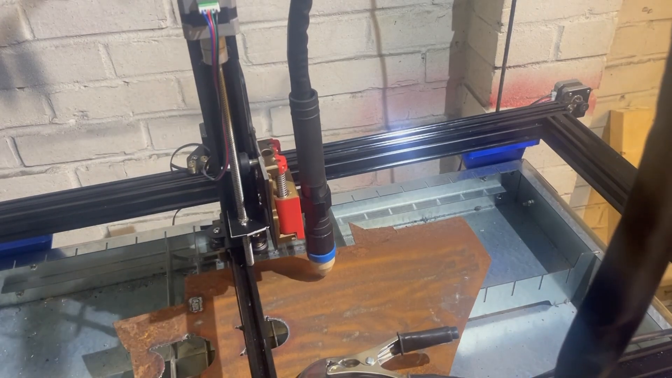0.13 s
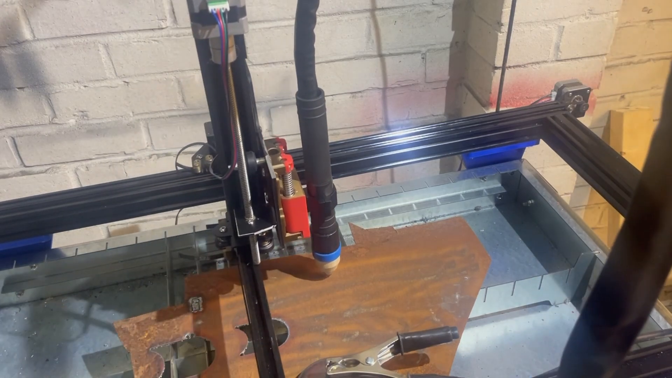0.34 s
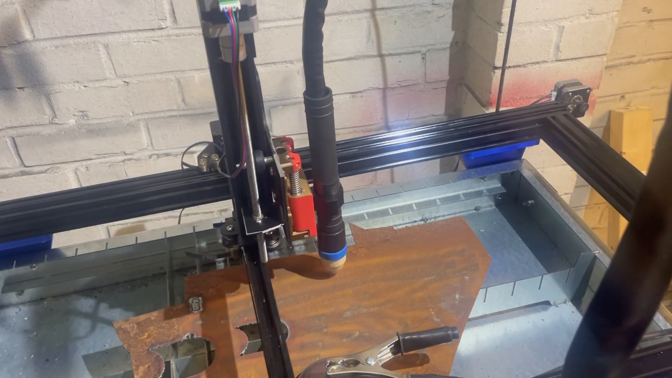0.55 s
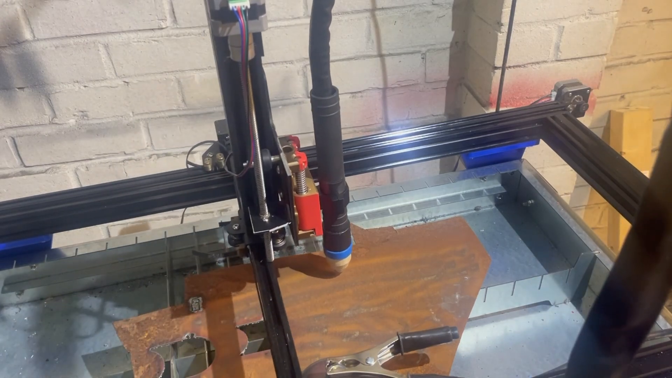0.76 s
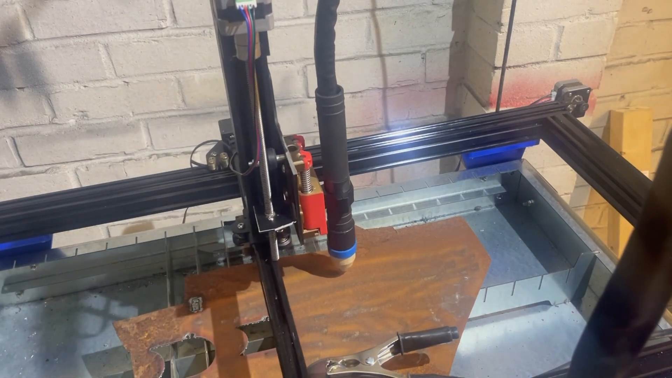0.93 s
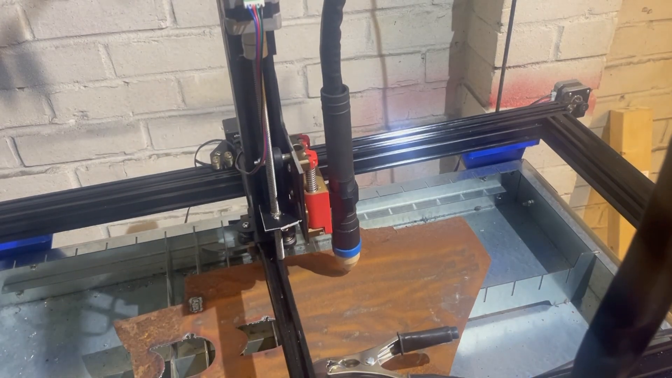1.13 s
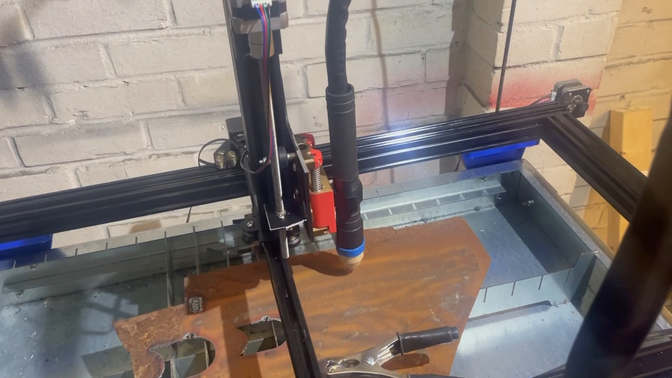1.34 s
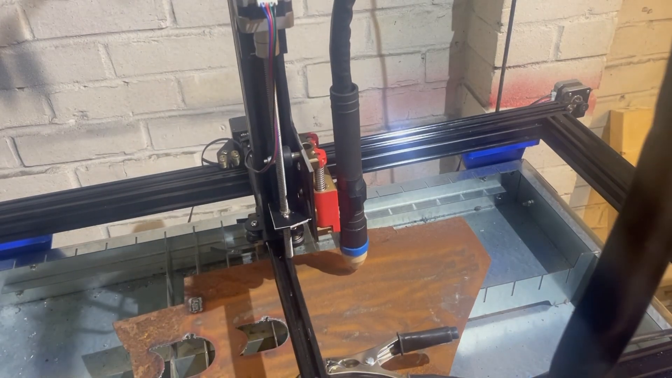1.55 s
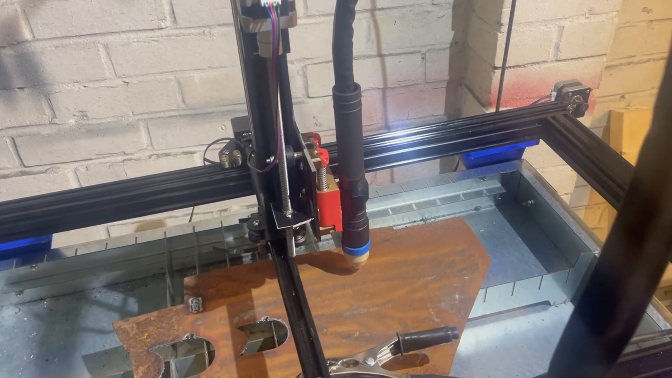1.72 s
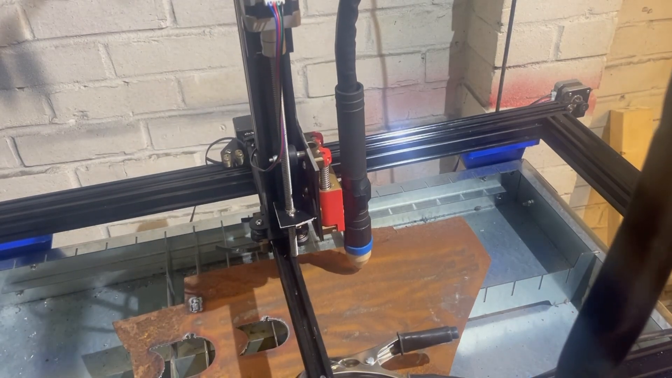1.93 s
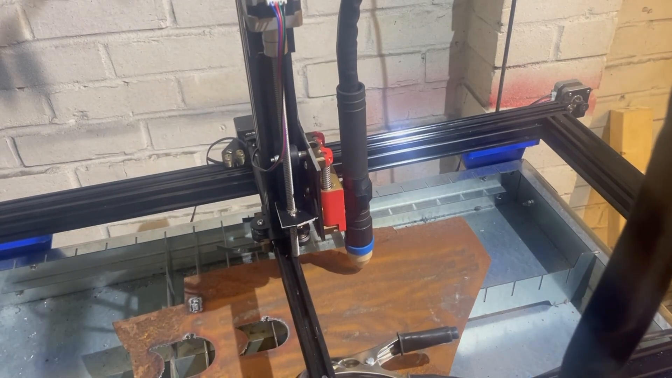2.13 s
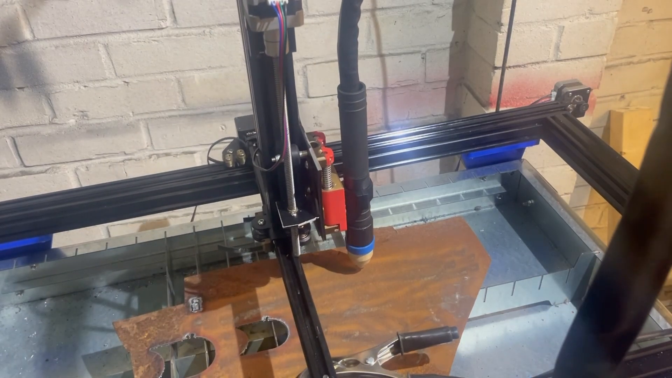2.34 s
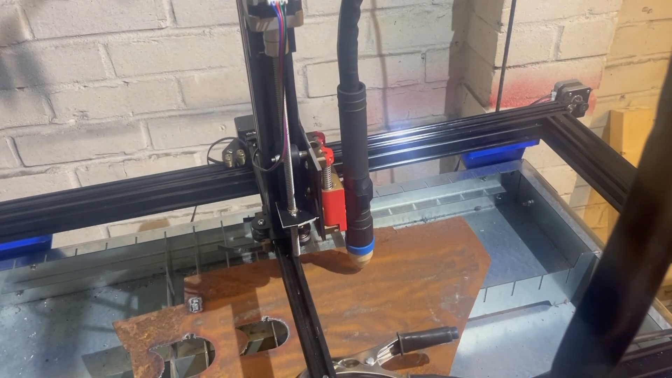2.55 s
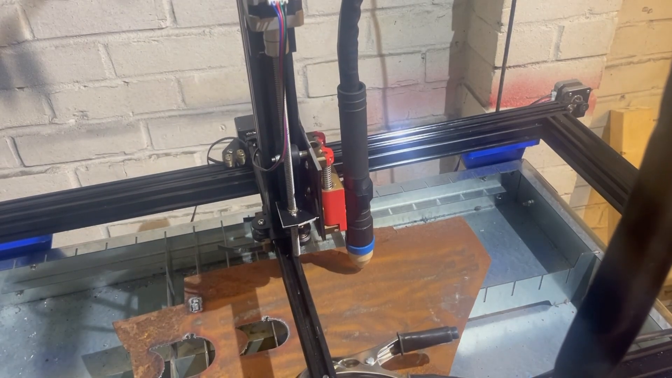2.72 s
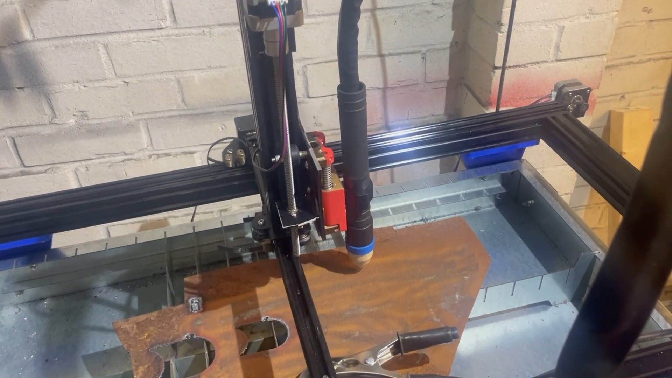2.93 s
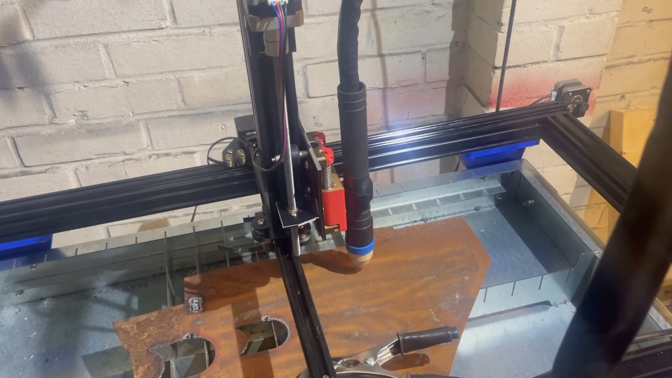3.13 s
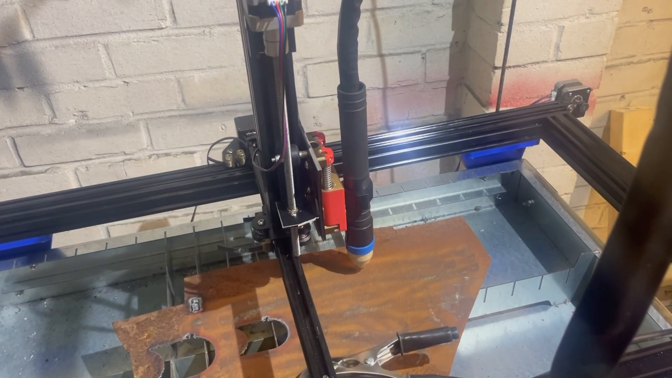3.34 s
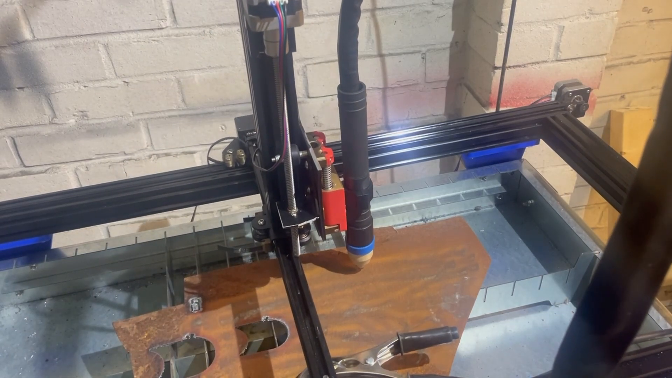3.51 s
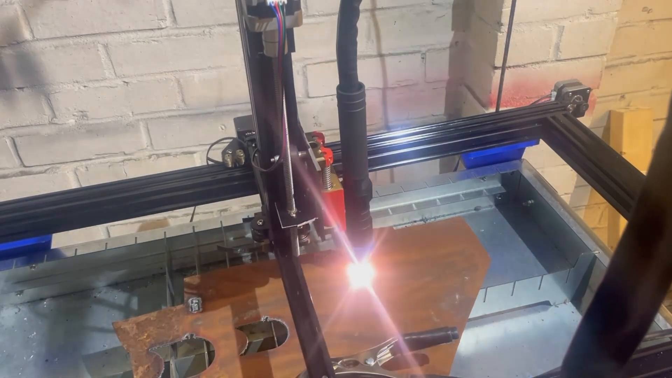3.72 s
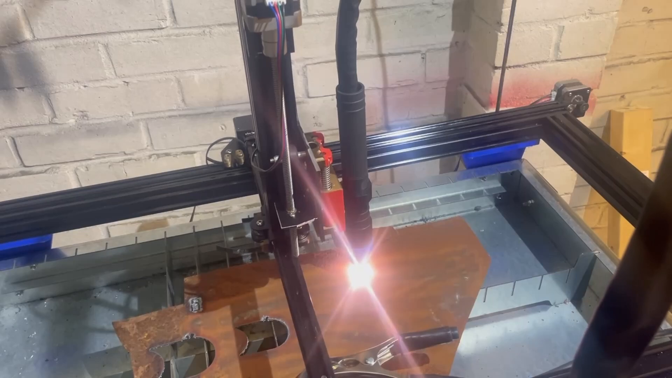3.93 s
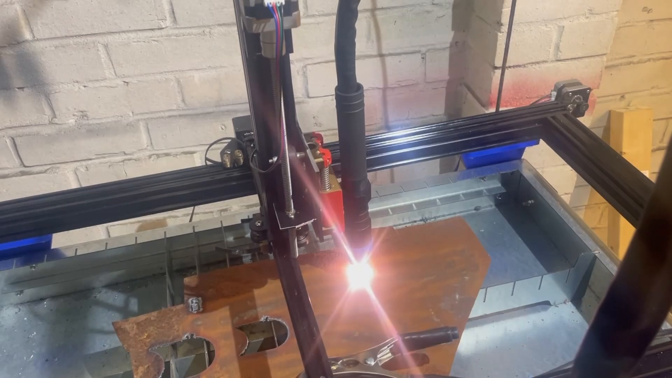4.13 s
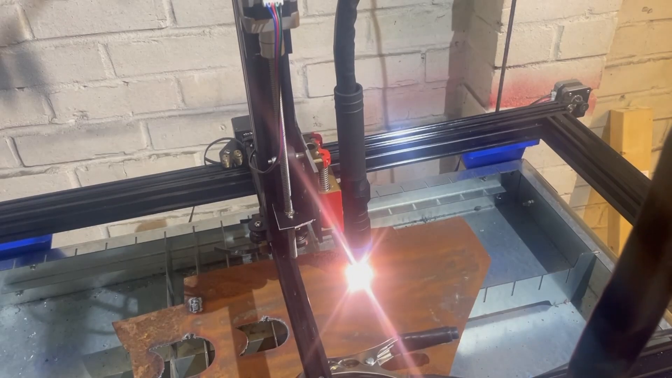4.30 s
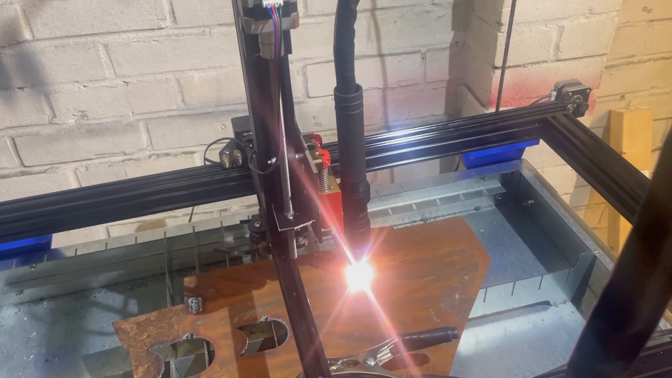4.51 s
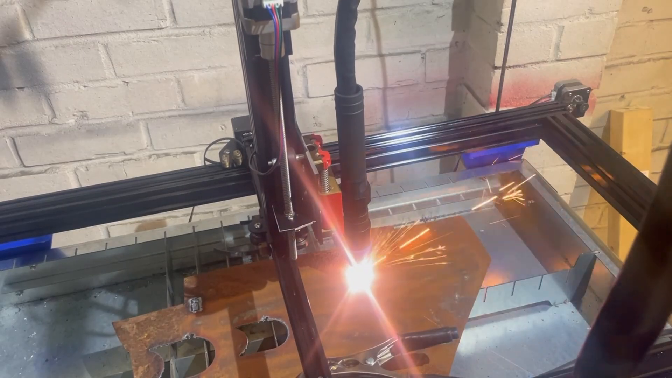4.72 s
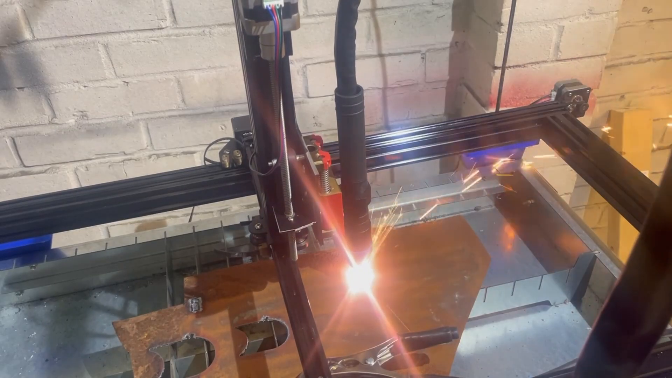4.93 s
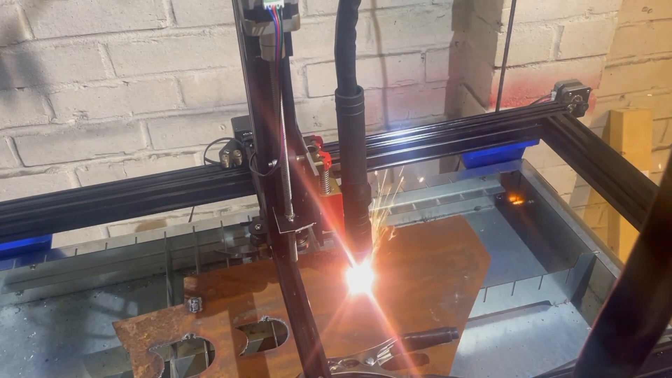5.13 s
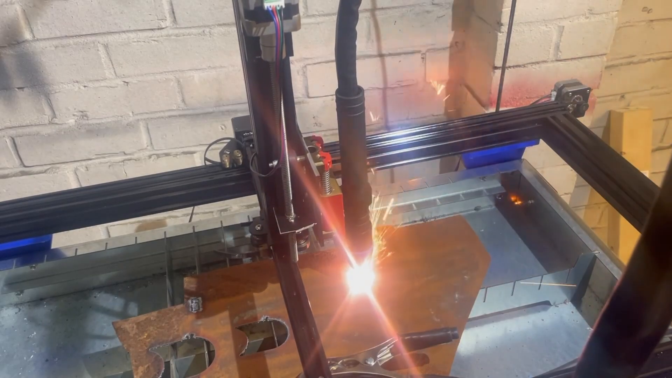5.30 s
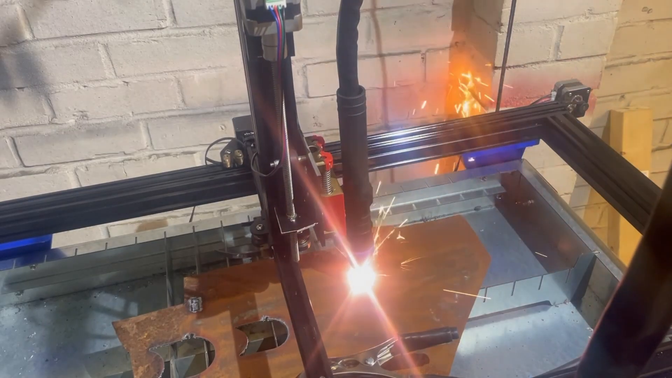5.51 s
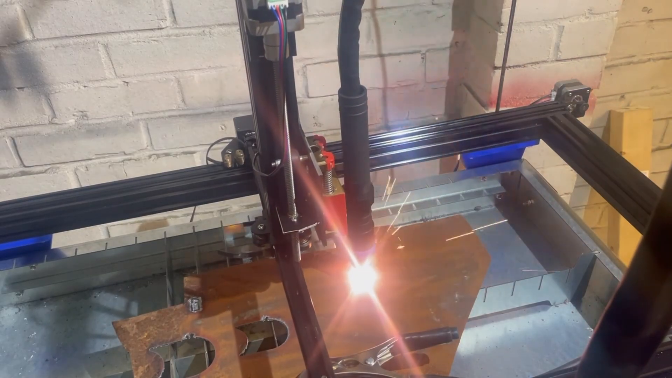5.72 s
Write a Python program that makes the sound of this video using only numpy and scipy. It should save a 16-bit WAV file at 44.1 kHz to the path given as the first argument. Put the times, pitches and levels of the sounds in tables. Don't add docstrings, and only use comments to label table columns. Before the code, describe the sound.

Close stereo pickup of a cutting machine: a crisp air hiss swells slightly and fades quickly, leaving low fan noise, thin motor whine and a soft housing rattle. After a tiny click and puff, the plasma jet bursts on abruptly, much louder, masking the background. Irregular short falling thumps hit the microphone, thick at first, then scattered, while the steady hiss continues to the end.

```python
import sys
import numpy as np
from scipy import signal
from scipy.fft import rfft, irfft, next_fast_len
from scipy.io import wavfile
from scipy.ndimage import uniform_filter1d, map_coordinates

SR = 44100
rng = np.random.default_rng(int(sys.argv[2]) if len(sys.argv) > 2 else 0)


def log_audio(samples):
    frames = np.atleast_2d(samples).T
    limited = np.clip(frames, -1, 1)
    pcm = np.round(limited * 32767).astype(np.int16)
    wavfile.write(sys.argv[1], SR, pcm)


def amplitude_ratio(level_db):
    exponent = np.asarray(level_db, float) / 20
    return 10 ** exponent


N = 258426
STRIKE_S = 3.54


# time in seconds, level in dB.
ARC_LEVEL = [
    (3.54, -33.5),
    (3.56, -37),
    (3.6, -35),
    (4.14, -34),
    (4.26, -39),
    (4.55, -39.5),
    (5.53, -38.5),
    (5.86, -38),
]
# frequency in Hz, density in dB per Hz.
ARC_HISS = [(5000, -23), (6500, -4), (8200, 0), (10500, -1), (13000, -2.5), (14200, -0.3), (15500, -12)]
ARC_BODY = [(40, -3), (200, -4), (800, -3), (1500, -1.5), (3000, 0.5), (4500, -2.5), (5600, 3.5),
            (7000, -9.5)]


def cutting_arc():
    settle_s = 0.089
    body_db = -4.5 + 4.5 * np.exp(-np.abs(seconds() - STRIKE_S) / settle_s)
    arc = jet((3.5, 9), curves(ARC_LEVEL)[0], body_db, ARC_HISS, ARC_BODY,
              hiss_db=5.5, body_db=4.5, flicker_db=0.5)
    return arc * between(3.5395, 9, 0.00089)


# start in seconds, level in dB, rise in ms, length in ms.
PUSHES = [(3.715, -23, 1.5, 41), (3.849, -27, 5.6, 35), (3.861, -20, 1.2, 40), (3.873, -22, 6.8, 12),
          (3.9228, -19.5, 2.6, 24), (3.9332, -17, 1.7, 26), (3.9696, -29, 1.9, 40), (4.014, -18, 1.2, 39),
          (4.0434, -20.5, 0.93, 15), (4.0494, -21, 0.66, 7), (4.0618, -26, 1.2, 64),
          (4.152, -27.5, 2.4, 43), (4.1653, -28, 2.5, 43), (4.18, -29.5, 2.1, 36), (4.2293, -25, 0.73, 46),
          (4.3267, -28.5, 1.5, 78), (4.3484, -24, .57, 16), (4.3902, -32, 2.6, 31),
          (4.541, -25.5, 0.81, 39), (4.6267, -26.5, 0.45, 25), (4.6443, -30.5, 2.1, 34),
          (4.815, -25.5, 1.8, 5.5), (4.8211, -26, 1.8, 29), (4.9892, -35.5, 4.4, 27),
          (5.254, -31.5, .75, 42), (5.453, -26, 6.5, 13), (5.6716, -32, 0.7, 26), (5.682, -32, 6.5, 43),
          (5.6849, -21.5, 1, 30), (5.7829, -17.5, 1.7, 31)]
# start in seconds, level in dB, rise in ms, length in ms.
PULLS = [(3.7226, -27, 0.73, 44), (3.737, -27, 4.5, 64), (3.8298, -20, 0.96, 33), (3.9094, -20.5, 0.84, 26),
         (3.9279, -22.5, 2.2, 10), (3.959, -25, 0.58, 26), (3.976, -27, 1.1, 76), (4.0374, -17, .33, 34),
         (4.0919, -22.5, 0.48, 36), (4.1606, -21.5, 1.4, 27), (4.2156, -20.5, 1.2, 13.5),
         (4.2574, -32.5, .89, 76), (4.286, -22.5, 1.7, 9.9), (4.3658, -25, 2.7, 11.3),
         (4.584, -30, 0.91, 41), (4.6223, -24.5, 2.8, 31), (4.7006, -29, 0.6, 17), (4.7676, -27, 0.87, 45),
         (4.8403, -28.5, 1.4, 23), (4.85, -27.5, 1.6, 35), (5.2238, -34.5, 2.2, 38),
         (5.357, -35.5, 3.9, 48), (5.518, -34.5, 1.7, 28), (5.6398, -34.5, 1.1, 37),
         (5.657, -26.5, 1.1, 43), (5.7018, -29, 2.6, 37), (5.7132, -32.5, 2.5, 24), (5.766, -24.5, 5, 24),
         (5.799, -30, 5.7, 10), (5.816, -28, 2.1, 28)]
# start in seconds, level in dB, rise in ms, length in ms.
STRIKE_PULL = (3.5401, -43, 0, 15)


def bursts():
    stray_count, first_s, last_s = 18, 3.6, 5.8
    stray_db, spread_db, stray_rise_ms, stray_length_ms = -47, 3, 4, 30
    strays = []
    for when, way, size, soft, long in rng.random((stray_count, 5)):
        start_s = first_s + (last_s - first_s) * when
        level_db = stray_db + spread_db * (2 * size - 1)
        rise_ms, length_ms = stray_rise_ms * (0.5 + soft), stray_length_ms * (0.5 + long)
        strays.append((np.sign(way - 0.5), start_s, level_db, rise_ms, length_ms))
    pushes = [(1, *row) for row in PUSHES]
    pulls = [(-1, *row) for row in [*PULLS, STRIKE_PULL]]
    return pushes + pulls + strays


# frequency in Hz, density in dB per Hz.
ROUGHNESS = [(60, -7), (150, -5), (300, -2.5), (450, -5), (900, -15), (3000, -60)]


def gas_shoves():
    out = np.zeros((2, N + 3000))
    t = np.arange(1, 3000) / SR
    t_ms = t * 1000
    sweep = np.sin([[6.9], [6.75]] * np.log(t_ms) + 45 * t + [[0.5], [1.4]])
    roughness = rush((3.5, 9), ROUGHNESS, [(100, 0.76)], [(100, 0)], JET_LEAD,
                  patchy_db=-2.5, ripple_db=1.5, scatter_db=2.5)
    roughness = np.pad(roughness, ((0, 0), (0, len(t))))
    for way, start_s, db, rise_ms, length_ms in bursts():
        start = round(start_s * SR)
        here = slice(start, start + len(t))
        rise = 1 - np.exp(-t_ms / (rise_ms * np.array([[1.1], [0.65]])))
        fade = np.exp(-(t_ms / (0.94 * length_ms)) ** 2)
        out[:, here] += way * amplitude_ratio(db + 0.1) * rise * fade * sweep
        out[:, here] += amplitude_ratio(db - 26) * np.sqrt(fade) * rise * roughness[:, here]
    hz = np.fft.rfftfreq(out.shape[1], 1 / SR)
    shade = 1 / np.sqrt(1 + (hz / np.array([[520], [2500]])) ** 6)
    low_cut = 1 / np.sqrt(1 + (42 / (hz + 1)) ** 4)
    return irfft(rfft(out) * shade * low_cut, out.shape[1])[:, :N]


# frequency in Hz, density in dB per Hz.
COOLING_HISS = [(5000, -22.5), (6500, -4.5), (8200, -0.5), (10500, -2), (13000, -6.5), (14200, -8),
                (15500, 6.5)]
COOLING_BODY = [(100, -19), (400, -3.5), (900, -4.5), (2000, -2), (4000, -1.5), (5800, 3.5), (7000, -4)]


def cooling_air():
    shut_s, empty_s, swell_db_per_s = 1.117, 0.31, 2
    t = seconds()
    empty = np.clip((t - shut_s) / empty_s, 0, 2)
    hiss_loss_db = 48 * empty ** 1.8
    body_loss_db = 23.5 * empty
    level_db = -53.5 + swell_db_per_s * np.minimum(t, shut_s) - hiss_loss_db
    rel_db = -5.5 + hiss_loss_db - body_loss_db
    cold = jet((0, 1.5), level_db, rel_db, COOLING_HISS, COOLING_BODY,
               hiss_db=7, body_db=6.5, flicker_db=0.48)
    return cold * between(-1, 1.437, 0.12)


# time in seconds, level in dB.
PILOT_LEVEL = [
    (3.492, -81),
    (3.497, -52.5),
    (3.508, -58),
    (3.514, -48),
    (3.53, -53.5),
    (3.539, -53),
]
# frequency in Hz, density in dB per Hz.
PILOT_SPECTRUM = [(300, 2), (3000, -1), (7000, -1), (15500, -14)]


def pilot_air():
    air = rush((3.4, 3.7), PILOT_SPECTRUM, JET_ALIKE, JET_BALANCE, JET_LEAD,
               patchy_db=-1.5, ripple_db=3, scatter_db=3)
    return amplitude_ratio(curves(PILOT_LEVEL)[0]) * between(3.492, 3.545, 0.002) * air


# start in seconds, peak in dB, ring in Hz.
CLACKS = [
    (3.4935, -53, 4970),
    (3.4972, -49, 2220),
    (3.513, -52, 9000),
    (3.518, -40, 900),
    (3.539, -40, 2980),
]


def valve():
    out = np.zeros((2, N))
    t = np.arange(SR // 50) / SR
    for start_s, db, hz in CLACKS:
        ring = np.sin(2 * np.pi * hz * t) + 0.46 * rng.standard_normal((2, len(t)))
        fall_db = 60 * t / 0.0067
        out[:, round(start_s * SR):][:, :len(t)] += amplitude_ratio(db - fall_db) * ring
    return out


# frequency in Hz, right lead in radians.
JET_LEAD = [(100, .3), (4500, .3), (6500, -3.1), (6501, 3.1), (8800, 3.1), (10500, 0), (12200, 0),
            (13300, -3.1), (14900, -3.2), (15700, -3.85)]
# frequency in Hz, shared power from 0 to 1.
JET_ALIKE = [(100, 0.86), (800, 0.52), (3500, 0.65), (6000, 0.041), (7000, 0.91), (8000, 0.99),
             (9500, 0.87), (11300, 0.99), (12900, 0.8), (14500, 0.93), (15700, 0.98)]
# frequency in Hz, left-right in dB.
JET_BALANCE = [(300, 0), (800, -2), (2000, 0), (5500, -4.5), (7000, 0)]


def jet(span_s, level_db, rel_db, hiss, body, hiss_db, body_db, flicker_db):
    level_db = level_db + flicker_db * (wobble(12) + wobble(90))
    ports = JET_ALIKE, JET_BALANCE, JET_LEAD
    fine = rush(span_s, hiss, *ports, patchy_db=0.8, ripple_db=2.5, scatter_db=2.5)
    broad = rush(span_s, body, *ports, patchy_db=0.6, ripple_db=2.2, scatter_db=0.8)
    return amplitude_ratio(level_db) * (amplitude_ratio(hiss_db) * fine + amplitude_ratio(rel_db + body_db) * broad)


# frequency in Hz, level in dB.
HOSE = [(1400, -88), (1740, -71), (1880, -80), (2080, -71), (2300, -88), (2900, -82), (3550, -74),
        (4300, -100)]
# multiple of the pitch, level in dB.
OVERTONES = [
    (1, 0),
    (2, -5),
    (3, -6),
]


def bleeding_hose():
    start_s, end_s, first_hz, fall_per_s = 1.24, 1.97, 2060, 1.17
    bleed_hz = first_hz * np.exp(-fall_per_s * (seconds() - start_s))
    whistle = 0
    for k, db in OVERTONES:
        whistle = whistle + amplitude_ratio(along(HOSE, k * bleed_hz) + db) * tone(k * bleed_hz, 25, 1.5)
    return whistle * between(start_s, end_s, 0.12)


# time in seconds, level in dB.
MOTOR_LEVEL = [
    (0, -81),
    (.4, -67.5),
    (1.43, -73.5),
    (1.8, -66.5),
    (3.5, -64.5),
]


def motor():
    pan_db = np.array([[-1.5], [1.5]])
    return amplitude_ratio(curves(MOTOR_LEVEL)[0] + pan_db) * tone(566.8, 5, 0.6, steady=2.5)


# frequency in Hz, level in dB, unsteadiness in Hz, left-right in dB, right lead in radians.
HUM = [
    (53, -82, 14, 0, 0),
    (650, -83, 4, 0, .5),
    (1135, -80.5, 3, -1, 1.5),
    (1621, -75, 4, -1, -1.5),
    (1707, -88, 5, 0, -2),
    (925, -89, 5, 0, 2),
    (12247, -100, 4, 0, 1),
]


def hum():
    out = 0
    for hz, db, spread_hz, pan_db, lead in HUM:
        gain = amplitude_ratio(db + pan_db * np.array([[0.5], [-0.5]]))
        out = out + gain * tone(hz, spread_hz, lead, steady=1.1)
    return out


# frequency in Hz, level in dB, unsteadiness in Hz.
HOUSING = [
    (387.6, -0.5, 40),
    (320, -5, 50),
    (432, -8, 30),
]


def rattle():
    sway_db, grows_db_per_s = 2.5, 0.9
    modes = 0
    for hz, db, spread_hz in HOUSING:
        modes = modes + amplitude_ratio(db + sway_db * wobble(8)) * tone(hz, spread_hz, 0.52, steady=0.1)
    return amplitude_ratio(-72.5 + grows_db_per_s * seconds()) * modes


# frequency in Hz, density in dB per Hz.
FANS = [(25, -21), (65, -10), (220, -22.5), (400, -11), (600, -16), (800, -20), (1700, -24.5), (2200, -26),
        (4000, -32.5), (6500, -38.5), (9000, -49), (12000, -50), (15000, -51)]
# frequency in Hz, shared power from 0 to 1.
FAN_ALIKE = [(60, 0.98), (550, 0.3), (1300, 0.085), (3000, 0.31), (6000, .1), (7000, 0.87), (9500, 0.89),
             (11000, .85), (15000, .85)]
# frequency in Hz, left-right in dB.
FAN_BALANCE = [(60, 0.5), (150, 1), (380, 4), (950, 0), (2380, -2.5), (5980, -4), (15000, 3)]


def fans():
    return amplitude_ratio(-67) * rush((0, 9), FANS, FAN_ALIKE, FAN_BALANCE, JET_LEAD,
                           patchy_db=0.0, ripple_db=1.5, scatter_db=0.5)


def shop():
    duck = 1 - 1.05 * between(STRIKE_S, 9, 0.05)
    return duck * (fans() + rattle() + hum() + motor() + bleeding_hose())


def rush(span_s, spectrum, alike, balance, lead, patchy_db, ripple_db, scatter_db):
    start, end = (min(int(s * SR), N) for s in span_s)
    m = next_fast_len(end - start)
    z = signal.stft(rng.standard_normal((3, m)), nperseg=1024)[2]
    field = z.shape[1:]
    z = z * amplitude_ratio(patchy_db * patches(field, 8, 5) + ripple_db * patches(field, 1, 60))
    z[1:] *= amplitude_ratio(scatter_db * patches(field, 24, 8))
    shared, *own = rfft(signal.istft(z, nperseg=1024)[1][:, :m])
    hz = np.fft.rfftfreq(m, 1 / SR)
    share = np.clip(along(alike, hz), 0, 1)
    turn = np.exp(1j * along(lead, hz) * [[0], [1]])
    ports = np.sqrt(share) * shared * turn + np.sqrt(1 - share) * np.array(own)
    gain_db = along(spectrum, hz) + along(balance, hz) * [[0.5], [-0.5]]
    gain = amplitude_ratio(gain_db) * (hz < 15760)
    noise = irfft(ports * gain, m)[:, :end - start]
    return np.pad(unit(noise), ((0, 0), (start, N - end)))


def tone(hz, spread_hz, lead, steady=0.86):
    drift = (wobble(spread_hz) + 1j * wobble(spread_hz)) * 0.26 + steady
    carrier = np.exp(2j * np.pi * np.cumsum(hz + np.zeros(N)) / SR)
    turn = np.exp(1j * np.array([[0], [lead]]))
    return unit(np.real(drift * carrier * turn))


def patches(shape, bins, frames):
    field = uniform_filter1d(rng.standard_normal(shape), size=bins, axis=0)
    return unit(uniform_filter1d(field, size=frames, axis=1))


def wobble(rate_hz):
    coarse = np.arange(0, N + 64, 64)
    knots = rng.standard_normal(int(N * rate_hz / SR) + 4)
    return np.interp(np.arange(N), coarse, map_coordinates(knots, [coarse * rate_hz / SR]))


def between(start_s, end_s, edge_s):
    t = seconds()
    return np.clip((t - start_s) / edge_s, 0, 1) * np.clip((end_s - t) / edge_s, 0, 1)


def curves(rows):
    s, *cols = np.transpose(rows)
    return [np.interp(seconds(), s, c) for c in cols]


def along(points, hz):
    f, v = np.transpose(points)
    return np.interp(np.log(hz + 1), np.log(f + 1), v)


def unit(x):
    return x / np.sqrt(np.mean(x ** 2) + 1e-20)


def seconds():
    return np.arange(N) / SR


def scene():
    torch = cutting_arc() + cooling_air() + pilot_air()
    return torch + gas_shoves() + valve() + shop()


def roll_off(x):
    return signal.sosfilt(signal.butter(12, 15990, fs=SR, output="sos"), x)


def record(dry):
    return roll_off(dry)


dry = scene()
out = record(dry)
log_audio(out)
```